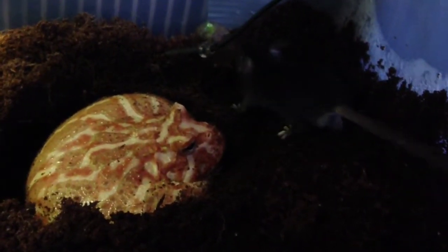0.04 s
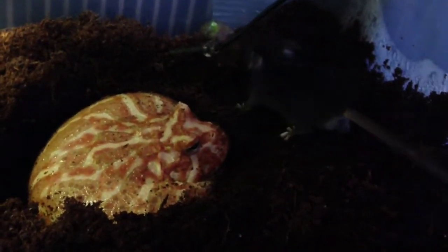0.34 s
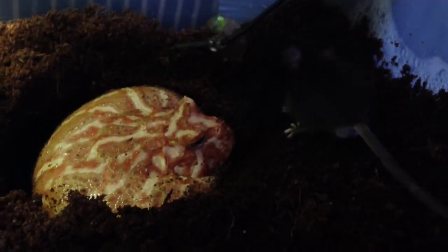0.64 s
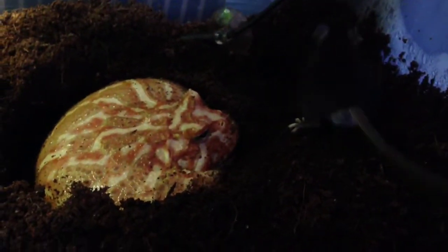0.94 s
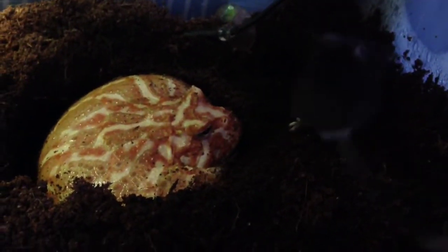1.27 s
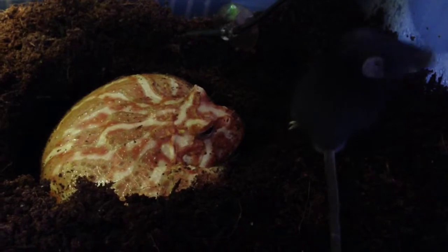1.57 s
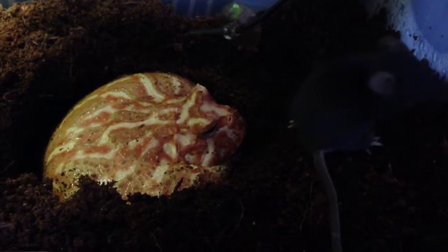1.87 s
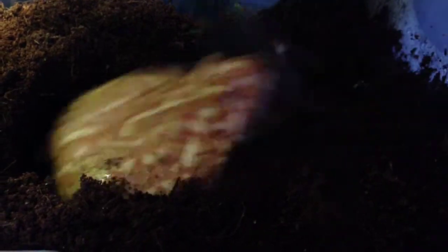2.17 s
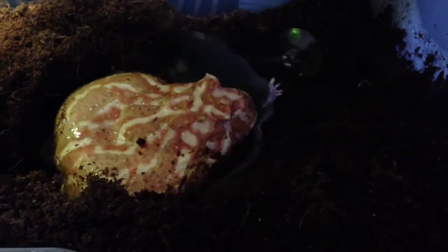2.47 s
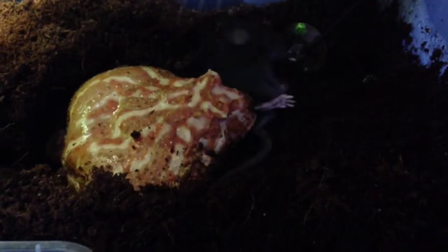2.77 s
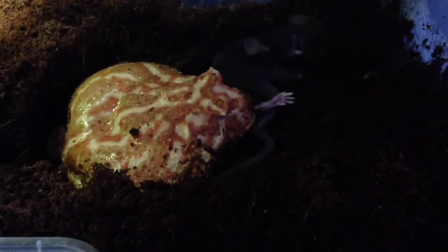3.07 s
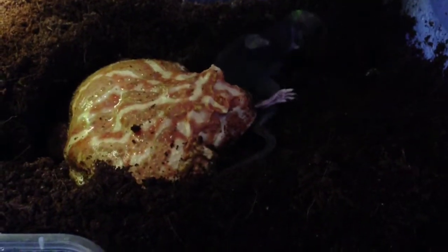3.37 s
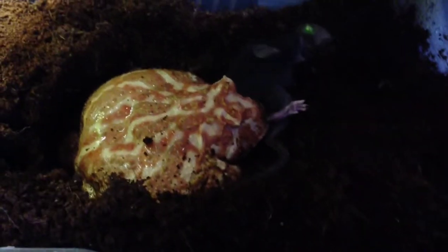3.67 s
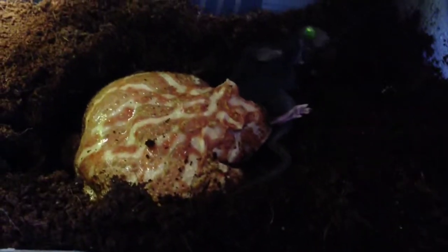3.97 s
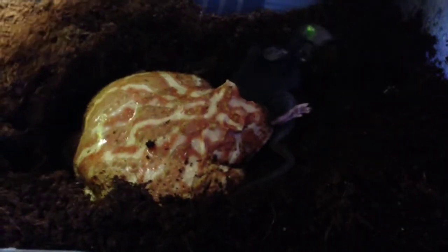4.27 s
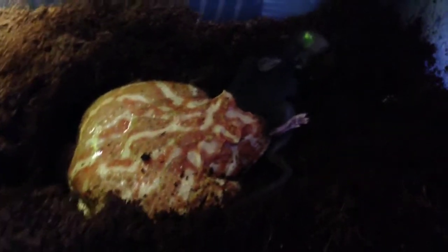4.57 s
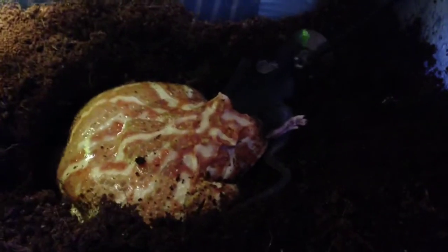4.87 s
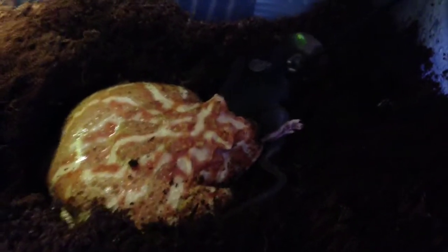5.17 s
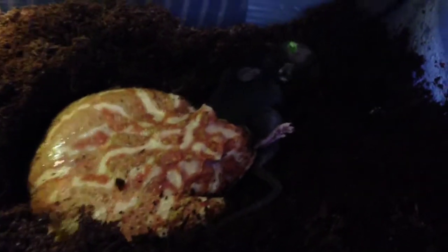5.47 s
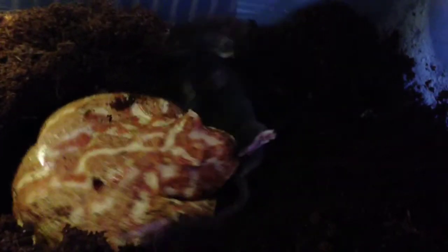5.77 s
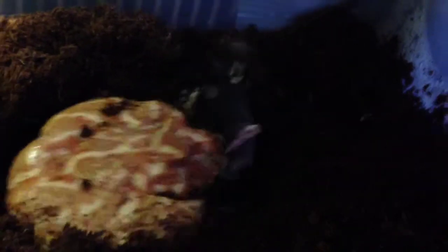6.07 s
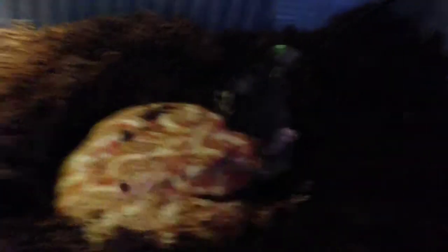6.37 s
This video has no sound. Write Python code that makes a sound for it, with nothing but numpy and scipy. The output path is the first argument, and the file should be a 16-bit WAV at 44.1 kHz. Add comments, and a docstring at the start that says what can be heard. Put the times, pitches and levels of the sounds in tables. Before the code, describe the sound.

A microphone sits close to the soil in a small indoor tank, with a quiet room's steady hum and hiss behind. Very faint mouse footfalls fade during the first second, and two soft bumps come near 1.4 seconds. At about 2.2 seconds a frog seizes the mouse: a faint chirp and a sharp click. A heavy, dull thump and a second faint chirp follow at 2.6, then one thin, high squeak around 2.8 to 2.9. Another thump lands at 3.5. Sharp clicks and lighter thumps come between 4.2 and 4.5, and a faint, dry slide near 4.7. From 5.7 to 6.3 the struggle brings a flurry of clicks and knocks against the tank, loudest at 5.8 and 6.2, with soft, gritty rubbing strokes continuing until 6.4. A heavy thump on the soil ends it at about 6.5 seconds.

```python
"""Horned frog seizing a mouse

A small indoor tank, the microphone close to the soil; behind it a quiet room with mains hum and hiss.
The mouse pads about, then gives two faint chirps and one thin, high squeak as the frog seizes it.
Bodies thump on the soil, sharp clicks knock the tank, and something slides and rubs."""
import sys
import numpy as np
from scipy import signal
from scipy.fft import rfft, irfft
from scipy.io import wavfile
from scipy.ndimage import uniform_filter1d

SR = 44100
rng = np.random.default_rng(int(sys.argv[2]) if len(sys.argv) > 2 else 0)


def to_wav(s):
    """Save 16-bit WAV."""
    ch = np.atleast_2d(s).T  # columns
    pcm = np.round(np.clip(ch, -1, 1) * 32767)  # PCM
    wavfile.write(sys.argv[1], SR, pcm.astype(np.int16))


N = 292843
TIME = np.arange(N) / SR
HIT_TIME = TIME[:SR // 8] - TIME[SR // 32]  # seconds around one blow, zero at its height

# rumble of the room around the tank: (frequency [Hz], relative level [dB])
RUMBLE_COLOUR = [(15, -45), (25, -26), (51, 0), (92, -4), (123, -3), (145, -11), (205, -8), (278, -15.5),
                 (355, -11.5), (399, -16.5), (496, -21.5), (541, -20.5), (800, -38), (1040, -58),
                 (1760, -120)]
# hiss of the room and the microphone: (frequency [Hz], relative level [dB])
HISS_COLOUR = [(600, -6.5), (760, -5.5), (1020, 0.5), (1250, -4), (1700, 4), (1950, 0), (2400, -2),
               (2800, -13.5), (3500, -4), (4400, -9.5), (7000, -12.5), (10000, -14.5), (15000, -15.5)]
# mains hum and an appliance's faint whine in the background: (frequency [Hz], level [dB])
HUM_TONES = [(119.6, -58), (359, -74), (1219, -76), (1700, -77), (1922, -72)]

# the dull sound of soil under weight: (frequency [Hz], relative level [dB])
SOIL_COLOUR = [(60, -32), (120, 9.5), (220, 6.5), (330, -3.5), (480, -8.5), (800, -19)]
# bodies landing near the microphone:
# (time [s], level [dB], pitch [Hz], tank knock [dB], contact cut-off [Hz])
SOIL_THUMPS = [ (1.3705, -40, 173, -66, 500), (1.434, -32, 128, -60, 500), (2.1068, -30.5, 125, -48, 896),
               (2.561, -7, 205, -12.5, 477), (2.960, -40.5, 159, -69, 500), (3.495, -13, 186, -21, 1410),
               (4.037, -40, 165, -66, 500), (4.231, -23, 134, -17, 890), (4.2617, -40, 150, -16.5, 845),
               (4.266, -24, 98, -55, 500), (4.4219, -32, 178, -58, 600), (4.48, -32, 166, -41, 1200),
               (4.499, -35, 120, -52, 600), (5.5354, -31.5, 164, -44, 700), (5.7837, -29.5, 139, -51, 600),
               (5.8424, -17, 145, -28, 700), (5.9435, -33, 124, -43, 600), (6.255, -31.5, 198, -35, 1200),
               (6.2739, -30, 170, -28, 1200), (6.542, -4.5, 166, -8.5, 710)]
# what the tank rings with: (frequency [Hz], rise [s], relative level [dB])
TANK_MODES = [(301, 0.0041, -8), (479, 0.0043, -7.5), (713, 0.0031, -3.5), (1097, 0.002, -9.5),
              (1535, 0.00069, -2.5)]

# the mouse's first chirp: (time [s], pitch [Hz], effort [dB])
GASP_CHIRP = [(2.183, 3100, -64), (2.200, 2730, -55), (2.207, 2300, -40), (2.213, 2450, -45),
              (2.217, 3620, -47), (2.222, 3800, -39.5), (2.238, 3500, -52)]
# its second chirp, rising and falling: (time [s], pitch [Hz], effort [dB])
ARCHED_CHIRP = [(2.569, 3480, -52), (2.594, 3830, -40), (2.609, 4080, -43), (2.632, 3800, -51),
                (2.641, 3330, -42), (2.650, 3400, -50)]
# its thin squeak: (time [s], pitch [Hz], effort [dB])
SQUEAK = [(2.762, 3480, -52), (2.771, 4220, -44.5), (2.779, 4430, -46), (2.796, 4340, -50),
          (2.825, 4385, -41.5), (2.864, 4450, -40.5), (2.882, 4620, -44.5), (2.893, 4350, -36),
          (2.907, 3280, -38.5), (2.916, 3430, -46)]
# how each call is voiced: (call table, overtone level [dB], rasp [dB], settling time [s])
VOICING = [(GASP_CHIRP, -14.5, -20, 0.033), (ARCHED_CHIRP, -24.5, -28, .003), (SQUEAK, -5, -31, 0.0059)]
# air hissing through a rough voice: (frequency [Hz], relative level [dB])
SCRATCH_COLOUR = [(2500, -9), (3400, -5), (5000, -3), (7200, 4), (10000, -14)]
# resonances of the mouse's throat and mouth: (frequency [Hz], gain [dB])
THROAT_RESPONSE = [(2000, -9), (3400, 3.5), (3900, -1), (4500, -9.5), (5500, 6), (7000, -8), (8000, 11),
                   (8700, 14), (9300, 20), (10000, 5), (12300, -13), (13200, 7), (14300, -14)]

# sharp clicks of the struggle, close up: (time [s], crack level [dB], pitch [Hz], tank knock [dB])
STRUGGLE_CLICKS = [ (2.263, -14.5, 5150, -23.5), (3.494, -44, 3000, -67), (4.2286, -33, 2470, -29),
                   (4.2358, -35, 9600, -37), (4.2605, -9, 3550, -28.5), (4.4987, -27, 3720, -42),
                   (5.165, -39, 4300, -44.5), (5.735, -50, 2500, -35.5), (5.779, -32.5, 2440, -32.5),
                   (5.8269, -15.5, 3430, -24), (5.8377, -2.5, 3670, -13), (5.842, -18, 4170, -17.5),
                   (5.8487, -15.5, 4600, -22), (5.8851, -34, 1500, -30), (5.938, -32.5, 1350, -47),
                   (5.9438, -31, 3570, -32), (5.9707, -37, 1400, -29.5), (6.0937, -37, 5030, -28.5),
                   (6.1038, -19, 5230, -26), (6.1046, -18, 1850, -19.5), (6.2157, -7, 2790, -13.5),
                   (6.2188, -23, 2500, -21), (6.4863, -38, 5100, -40.5), (6.539, -41, 2680, -31.5)]
# grit and hiss around a click: (frequency [Hz], relative level [dB])
CLICK_GRIT_COLOUR = [(1500, -19), (2700, 8), (4000, -5), (5800, -4.5), (7500, -20), (10000, -29),
                     (15000, -30)]

# dry slides over the soil: (peak time [s], level [dB])
SOIL_SLIDES = [(4.60, -56), (4.716, -47)]
# the hiss of a slide: (frequency [Hz], relative level [dB])
SLIDE_COLOUR = [(200, 4), (600, -0.5), (1000, -0.5), (2000, -6.5), (4500, -1.5), (7500, -10), (10000, -22),
                (15000, -27)]
# strokes of a heavier rub: (peak time [s], release [s], level [dB], grit level [dB])
RUB_STROKES = [(5.85, 0.026, -44, -61), (6.106, 0.058, -39.5, -54.5), (6.24, 0.031, -39.5, -59),
               (6.30, 0.045, -42, -53.5), (6.423, 0.024, -47.5, -58.5)]
# soil being rubbed or crunched: (frequency [Hz], relative level [dB])
RUB_COLOUR = [(100, 1.5), (300, -17), (550, -9.5), (800, -1.5), (1200, -9), (1700, -19.5), (2600, -20.5),
              (4000, -35.5)]
# grit on top of a rub: (frequency [Hz], relative level [dB])
RUB_GRIT_COLOUR = [(1800, -21), (2800, -5), (4000, 3), (5000, -2), (6000, -4), (7000, -14), (10000, -23),
                   (15000, -32)]


def undb(db):
    """Decibels to gain."""
    return 10 ** (np.asarray(db) / 20)


def unit(x):
    """Scale to rms 1."""
    return x / np.sqrt(np.mean(x ** 2))


def curves(rows):
    """The columns of a table, joined by straight lines in time."""
    times, *columns = np.transpose(rows)
    return [np.interp(TIME, np.sort(times), column) for column in columns]


def gate(rows, fade_s):
    """Open between a table's first and last moments."""
    inside_s = np.minimum(TIME - rows[0][0], rows[-1][0] - TIME)
    return np.clip(inside_s / fade_s + .5, 0, 1)


def response(hz, points):
    """Gain at the given frequencies of a (frequency [Hz], level [dB]) spectrum."""
    point_hz, db = np.transpose(points)
    return undb(np.interp(np.log(hz + 1), np.log(point_hz), db))


def colour(x, points):
    """Give x a spectrum that falls away steeply beyond its ends; rms 1."""
    hz = np.arange(len(x) // 2 + 1) * SR / len(x)
    ends = np.minimum(hz / points[0][0], 1) ** 2 / np.maximum(hz / points[-1][0], 1) ** 6
    return unit(irfft(rfft(x) * response(hz, points) * ends, len(x)))


def noise(points, length=N):
    """Steady noise with the given spectrum; rms 1."""
    return colour(rng.standard_normal(length), points)


def walk(rate):
    """Random levels held 1 / rate seconds and smoothed twice; rms 1."""
    hold = max(int(SR / rate), 1)
    steps = np.repeat(rng.standard_normal(N // hold + 1), hold)
    return unit(uniform_filter1d(uniform_filter1d(steps, hold), hold)[:N])


def swell(rise_s, late_s=0, order=2):
    """A yielding contact builds for rise_s, peaks at late_s and dies away; a higher order is narrower."""
    progress = np.maximum(1 + (HIT_TIME - late_s) / rise_s, 0)
    return (progress * np.exp(1 - progress)) ** order


def ring(hz, rise_s, late_s=0):
    """A heavily damped mode, strongest at late_s."""
    return -swell(rise_s, late_s, order=5) * np.cos(2 * np.pi * hz * (HIT_TIME - late_s))


def stroke(peak_s, attack_s, release_s):
    """A push that builds smoothly to its peak and eases off."""
    width_s = np.where(TIME < peak_s, attack_s, release_s)
    return np.exp(-((TIME - peak_s) / width_s) ** 2 / 2)


def add(out, at_s, sound):
    """Mix in a blow whose height falls at at_s."""
    start = int((at_s + HIT_TIME[0]) * SR)
    out[start:start + len(sound)] += sound[:N - start]


def friction(points, grain_db, spurts_per_s=130, spurt_db=1.7):
    """Anything dragged over soil catches and slips: countless tiny, uneven slips, coming in spurts."""
    slips = rng.standard_normal(N) * undb(grain_db * walk(900) + spurt_db * walk(spurts_per_s))
    return colour(slips, points)


def room_tone(rumble_db=-53.5, hiss_db=-59):
    """The quiet room behind the tank: gently wavering rumble, hum and whine, and smooth hiss."""
    rumble = noise(RUMBLE_COLOUR) * undb(rumble_db + walk(5.4))
    hiss = noise(HISS_COLOUR) * undb(hiss_db)
    hum = np.zeros(N)
    for hz, db in HUM_TONES:
        tone = np.sqrt(2) * np.sin(2 * np.pi * hz * TIME + .5 * walk(3.27))
        hum += tone * undb(db + 2 * walk(3.93))
    return rumble + hiss + hum


def mouse_feet(start_db=-52.5, fade_db_per_s=24):
    """Faint, dull footfalls run together on the soil and fade as the mouse comes to rest."""
    return friction(SOIL_COLOUR, grain_db=2.0) * undb(start_db - fade_db_per_s * TIME)


def tank_knock(contact_hz, lag_cycles=0.3):
    """The tank's modes: low ones answer later, and a soft contact cannot excite the high ones."""
    out = np.zeros(len(HIT_TIME))
    for hz, rise_s, db in TANK_MODES:
        excitation = np.exp(-(hz / contact_hz) ** 2 / 2) / np.sqrt(1 + (hz / contact_hz / 2) ** 10)
        out += undb(db) * excitation * ring(hz, rise_s, lag_cycles / hz)
    return out


def body_thumps(full_force_rise_s=0.0042, knock_lead_s=0.00052, sway_hz=88, sway_db=-22, settle_db=-30):
    """A body lands close by: the soil thuds and settles, the tank knocks and its base sways a little."""
    out = np.zeros(N)
    sway = undb(sway_db) * ring(sway_hz, rise_s=0.018, late_s=0.011)
    settling = undb(settle_db) * swell(rise_s=0.011, late_s=0.0092)
    for at_s, db, hz, knock_db, contact_hz in SOIL_THUMPS:
        force = undb(db)
        thud = ring(hz, full_force_rise_s / force ** 0.14)  # lighter landings yield for longer
        soil = settling * noise(SOIL_COLOUR, len(HIT_TIME))
        add(out, at_s, force * (thud + sway + soil))
        add(out, at_s - knock_lead_s, undb(knock_db) * tank_knock(contact_hz))
    return out


def mouse_calls(jitter=0.00092, shimmer_db=2.1, scratch_db=-9, onset_rasp_db=3, glide_rasp_db=-15,
                fast_octaves_per_s=45, third_harmonic_db=-17):
    """A wavering whistle shaped by throat and mouth; it starts as a scratch and roughens in glides."""
    out = np.zeros(N)
    for call, overtone_db, rasp_db, settle_s in VOICING:
        hz, effort_db = curves(call)
        glide = np.minimum(np.abs(np.gradient(np.log2(hz), TIME)) / fast_octaves_per_s, 1)
        onset = np.exp(-np.maximum(TIME - call[0][0], 0) / settle_s)
        roughness = undb(rasp_db) + undb(onset_rasp_db) * onset ** 2 + undb(glide_rasp_db) * glide
        phase = 2 * np.pi * np.cumsum(hz * (1 + jitter * walk(710))) / SR
        voice = roughness * undb(scratch_db) * noise(SCRATCH_COLOUR)
        # at full pitch the second harmonic meets a sharp mouth resonance
        for k, db in enumerate([0, overtone_db, overtone_db + third_harmonic_db], 1):
            # irregular vibration smears each harmonic into a band of noise
            rasp = roughness * (walk(2200) * np.sin(k * phase) + walk(2200) * np.cos(k * phase))
            voice += undb(db) * response(k * hz, THROAT_RESPONSE) * (np.sin(k * phase) + rasp)
        out += voice * undb(effort_db + shimmer_db * walk(300)) * gate(call, fade_s=0.0069)
    return out


def tank_echo(direct, echo_db=-22, decay_s=0.027):
    """The microphone hears the direct sound and a short, diffuse echo off the tank's walls."""
    walls = rng.standard_normal(len(HIT_TIME)) * np.exp(-TIME[:len(HIT_TIME)] / decay_s)
    echo = signal.fftconvolve(direct, walls / np.linalg.norm(walls))[:N]
    return direct + undb(echo_db) * echo


def struggle_clicks(rise_cycles=1.31, grit_db_per_octave=11, tail_db=-22, tail_s=0.012, crunch_db=-16,
                    tick_hz=7000, tick_db=10.5, thud_db=-2.5, thud_limit_hz=4200, hiss_swell_db=-28):
    """A hard contact crunches the soil, cracks, sheds grit and knocks the tank."""
    out = np.zeros(N)
    tail = undb(tail_db) * np.exp(-np.abs(HIT_TIME) / tail_s) * (HIT_TIME > 0)
    soil_thud = undb(thud_db) * ring(hz=165, rise_s=0.0026, late_s=0.0022)
    for at_s, db, hz, knock_db in STRUGGLE_CLICKS:
        crack_rise_s = rise_cycles / hz
        crack = undb(db) * ring(hz, crack_rise_s)
        grit_db = db - 27 + grit_db_per_octave * np.log2(hz / 3880)  # sharper cracks shed more
        shed = undb(grit_db) * (swell(rise_s=0.0026) + tail)
        # a faint, brief hiss swells around each click
        hiss_swell = undb(knock_db + hiss_swell_db) * swell(rise_s=0.012)
        grit_and_hiss = (shed + hiss_swell) * noise(CLICK_GRIT_COLOUR, len(HIT_TIME))
        # the break itself, just behind the crack's peak
        tick = undb(grit_db + tick_db) * ring(tick_hz, rise_s=0.00024, late_s=crack_rise_s)
        thud = soil_thud / (1 + (hz / thud_limit_hz) ** 6)  # the sharpest cracks hardly move the soil
        crunch = undb(crunch_db) * swell(rise_s=0.0098) * noise(RUB_COLOUR, len(HIT_TIME))
        body = undb(knock_db) * (tank_knock(contact_hz=4000) + thud + crunch)
        add(out, at_s, crack + tick + grit_and_hiss + body)
    return out


def sliding(attack_s=0.05, release_s=0.016):
    """A light, hissing slide over the soil gathers speed and stops short."""
    push = sum(undb(db) * stroke(peak_s, attack_s, release_s) for peak_s, db in SOIL_SLIDES)
    return push * friction(SLIDE_COLOUR, grain_db=1.8)


def rubbing(attack_share=0.68):
    """Heavier, halting strokes with grit on top; each builds faster than it eases off."""
    out = np.zeros(N)
    rub = friction(RUB_COLOUR, grain_db=2.3)
    grit = friction(RUB_GRIT_COLOUR, grain_db=2.0)
    for peak_s, release_s, db, grit_db in RUB_STROKES:
        push = stroke(peak_s, attack_share * release_s, release_s)
        out += push * (undb(db) * rub + undb(grit_db) * grit)
    return out


def scene():
    """One microphone close to the soil: the struggle in front, the room behind."""
    close_up = body_thumps() + struggle_clicks() + tank_echo(mouse_calls()) + sliding() + rubbing()
    return (close_up + mouse_feet() + room_tone())[None]


def record(dry, bass_hz=48, top_hz=15400):
    """The microphone loses the deepest bass and the recorder cuts the top."""
    low_cut = signal.butter(2, bass_hz, "high", fs=SR, output="sos")
    high_cut = signal.ellip(10, .1, 70, top_hz, fs=SR, output="sos")
    return signal.sosfilt(high_cut, signal.sosfilt(low_cut, dry))


dry = scene()
out = record(dry)
to_wav(out)
```